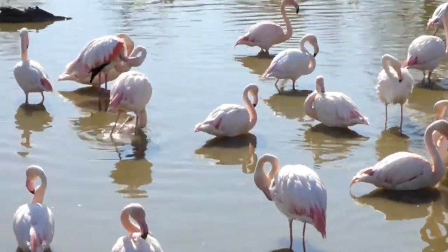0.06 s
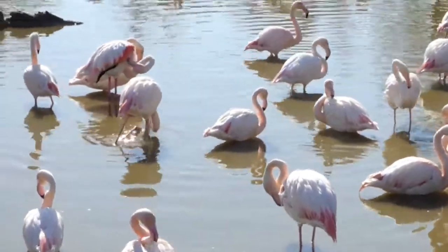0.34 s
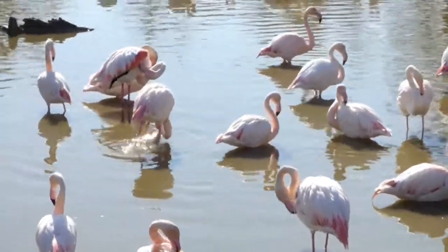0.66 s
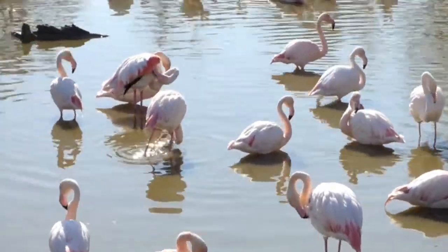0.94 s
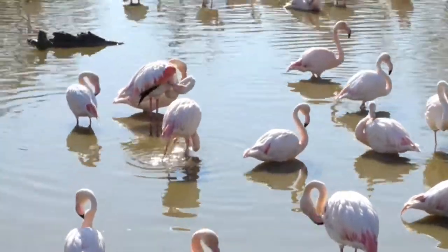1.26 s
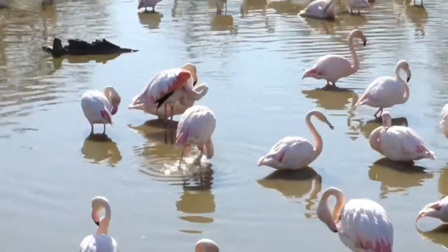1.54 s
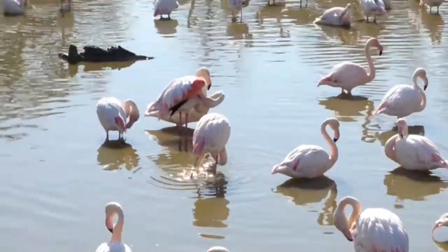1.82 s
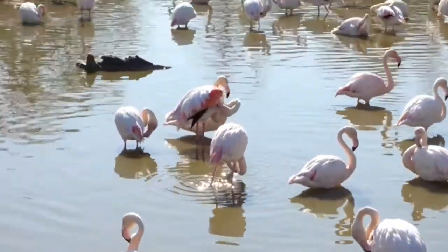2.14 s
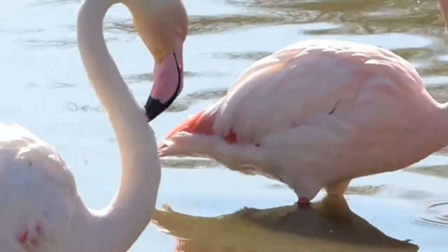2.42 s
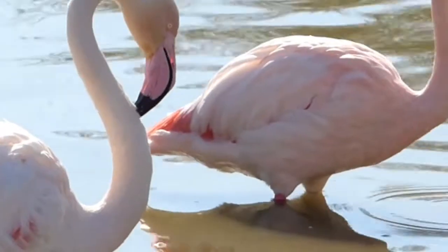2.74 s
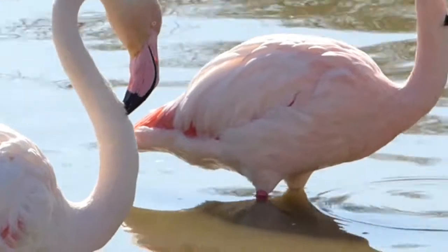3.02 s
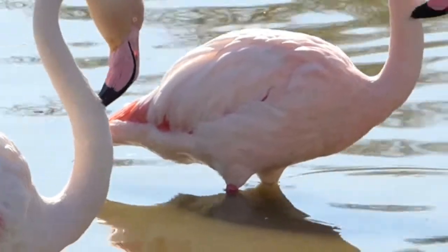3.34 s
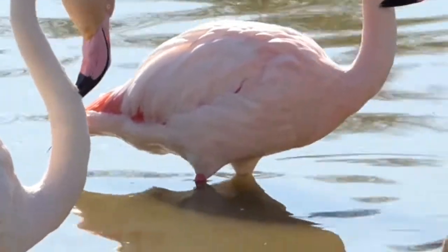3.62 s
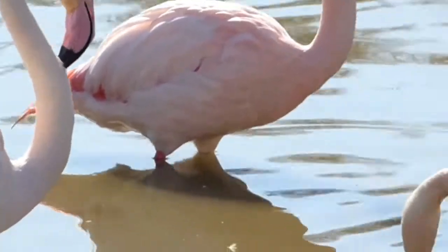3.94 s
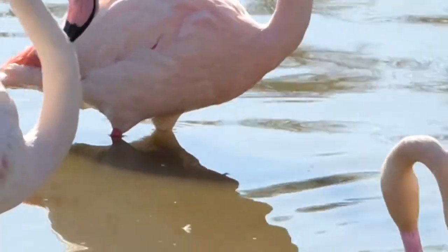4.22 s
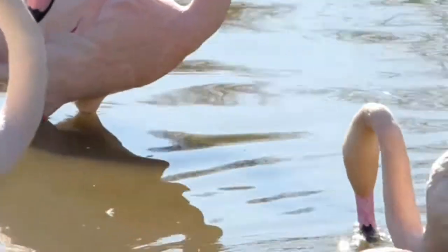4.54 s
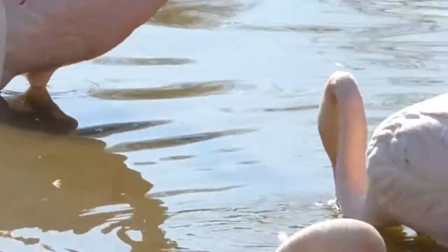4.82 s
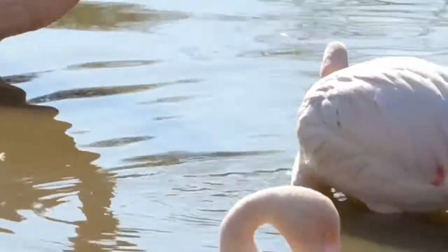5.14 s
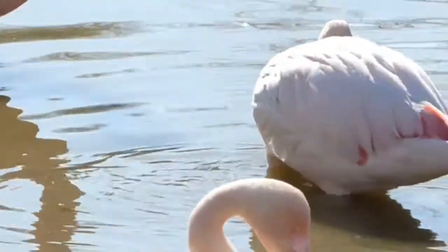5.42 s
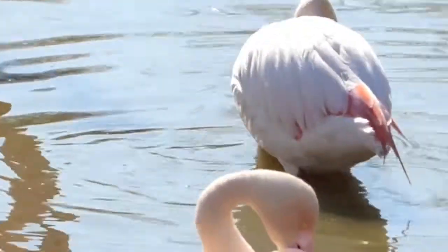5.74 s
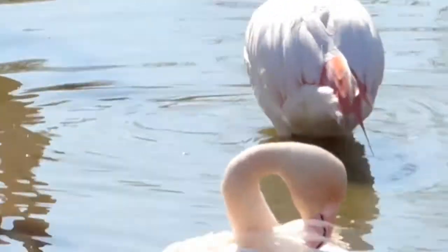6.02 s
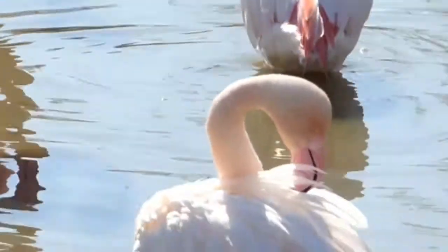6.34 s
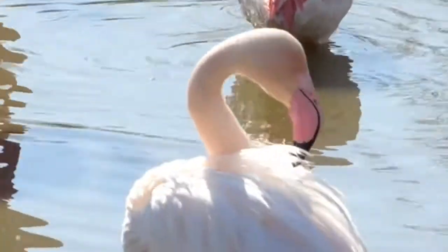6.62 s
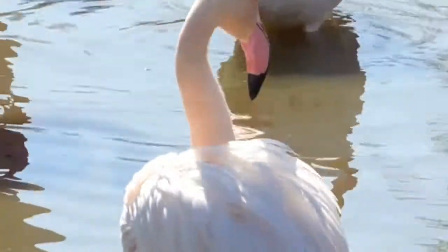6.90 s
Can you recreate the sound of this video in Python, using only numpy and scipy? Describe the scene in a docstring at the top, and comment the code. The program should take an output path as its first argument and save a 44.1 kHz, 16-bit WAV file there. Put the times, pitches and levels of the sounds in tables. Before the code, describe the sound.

On an open lagoon, a small bird gives thin, quavering whistles over soft flamingo calls. After a tiny dropout, the near flamingos grunt and honk louder, slightly left of the microphone, with the distant flock gabbling behind them. A second, longer silence interrupts, then the raspy grunts and reedy honks carry on busily to the end. One small water drip, a faint echo and a low rumble of outdoor air go with them.

```python
"""A lagoon, with flamingos close to the microphone and the rest of the flock gabbling farther out.
The near birds grunt as the syrinx rattles into throat and bill, and honk in short nasal arches.
Water drips from a bill, a small bird whistles early on, a distant one coos, and the banks echo faintly.
Under it all lie a low outdoor rumble and a far hum. The sound breaks off into silence twice;
the phrase between the silences returns later."""
import sys
import numpy as np
from scipy import signal
from scipy.fft import rfft, irfft, next_fast_len
from scipy.io import wavfile
from scipy.ndimage import uniform_filter1d, map_coordinates

SR = 44100
rng = np.random.default_rng(int(sys.argv[2]) if len(sys.argv) > 2 else 0)


def transcribe(signal):
    """Save signal, clipped to [-1, 1], as a 16-bit WAV file at the path in sys.argv[1]."""
    frames = np.atleast_2d(signal).T
    limited = np.clip(frames, -1, 1)
    pcm = np.round(limited * 32767).astype(np.int16)
    wavfile.write(sys.argv[1], SR, pcm)


N = 316197

# The spectra of a flamingo's throat and of the buzz at its bill. Each row: frequency in Hz, gain in dB.
THROAT_SPECTRUM = [(60, -48.5), (250, -31.5), (400, -26), (520, -12), (680, -7), (900, 2.5), (1130, 3),
                   (1450, -8), (1700, -20.5), (3000, -54.5)]
BUZZ_SPECTRUM = [(4000, -8), (7300, 9), (8400, 3), (9300, 0.5), (10100, -5.5), (11900, -0.5), (13200, -12)]
# The two silences. Each row: start, end and length of the fade back in, all in seconds.
GAPS = [(1.206, 1.288, 0.036), (2.367, 2.781, 0.00059)]


def grunts(lead_s=.008, attack_s=.017, release_s=.03, rattle_hz=96.9, nasal_hz=2170):
    """Close by, each rattle rings throat and nasal resonances, rasps in the windpipe, buzzes at the bill."""
    # Each row: start in seconds, length in seconds, throat level in dB, throat resonance in Hz, voice.
    calls = [(.025, .105, -35, 960, "soft"), (.39, 0.065, -40, 940, "soft"), (.49, 0.054, -35, 925, "soft"),
             (.588, 0.081, -32.5, 880, "soft"), (.711, .07, -34, 905, "soft"),
             (.829, 0.075, -32, 916, "full"), (.905, .065, -45, 960, "soft"),
             (1.135, 0.062, -38.5, 872, "soft"), (1.34, 0.049, -31, 894, "full"),
             (1.389, 0.056, -29.5, 957, "harsh"), (1.465, .045, -38.5, 950, "harsh"),
             (1.525, 0.068, -27.5, 990, "shrill"), (1.79, .094, -34.5, 863, "nasal"),
             (1.888, 0.058, -34, 1120, "buzzy"), (2.038, .08, -32.5, 911, "buzzy"),
             (2.143, .1, -25.5, 971, "round"), (2.295, .07, -29.5, 961, "round"),
             (2.809, .12, -30, 900, "nasal"), (3.038, .068, -36.5, 718, "deep"),
             (3.124, .045, -30.5, 1187, "bright"), (3.235, .072, -37.5, 1140, "round"),
             (3.307, .1, -35, 815, "raspy"), (3.443, .065, -31.5, 902, "full"),
             (3.64, .09, -30.5, 857, "deep"), (3.802, .08, -25.5, 861, "deep"),
             (4.01, 0.078, -35.5, 902, "nasal"), (4.105, .13, -31.5, 861, "croaky"),
             (4.245, 0.068, -36, 925, "croaky"), (4.31, 0.064, -37.5, 1000, "bright"),
             (4.372, .087, -33, 901, "harsh"), (4.496, .09, -28, 930, "round"),
             (4.584, 0.071, -33.5, 812, "nasal"), (4.858, 0.08, -30.5, 874, "full"),
             (4.984, .077, -29, 902, "full"), (5.044, 0.041, -32, 1164, "bright"),
             (5.125, 0.079, -28, 890, "raspy"), (5.24, .083, -25, 904, "full"),
             (5.494, 0.099, -29, 904, "croaky"), (5.612, 0.148, -25.5, 873, "full"),
             (6.79, .058, -25.5, 902, "deep"), (6.858, 0.064, -29, 874, "deep"),
             (6.915, 0.16, -30.5, 852, "harsh")]
    # Each voice: twang, rasp and buzz in dB over the throat, bill resonance in Hz, left over right in dB.
    voices = { "raspy": (-18, -8.5, -22.5, 8600, 3), "croaky": (-5.5, -7.5, -18, 8500, 6.5),
              "harsh": (-10, -6.5, -12.5, 8699, 3.5), "shrill": (-17.5, -5, -12.5, 12100.5, 4),
              "buzzy": (-10, -11.5, -5, 8398, 1.5), "round": (-21, -16, -18, 9496.5, 0.5),
              "deep": (-24.5, -14.5, -16, 10000, 2), "full": (-15, -12, -19, 8601, 2),
              "nasal": (-4.5, -8.5, -22.5, 8701, 7), "soft": (-11, -12, -27, 7799, 2),
              "bright": (-35, -7, -17, 8800, 3.5)}
    # The upper windpipe. Each row: frequency in Hz, gain in dB.
    rasp_spectrum = [(900, -27.5), (1500, -7.5), (2150, 2), (2400, -7), (2750, -2.5), (4200, 2.5),
                     (5300, 0), (6200, -9.5), (9000, -43.5)]
    out = np.zeros((2, N))
    for s, length, db, throat_hz, voice in calls:
        twang_db, rasp_db, buzz_db, bill_hz, pan_db = voices[voice]
        # forced, buzzing grunts rattle slowly and evenly; soft ones faster and raggedly
        rate = rattle_hz - .5 * buzz_db + rng.normal(0, 2)
        jitter = np.interp(buzz_db, [-22, -15], [.08, .02])
        source = rattle(length + lead_s + release_s / 2, rate, throat_hz * .97, jitter)
        t = np.arange(len(source)) / SR
        progress = t / t[-1]
        source = source * np.clip(np.minimum(t / attack_s, (t[-1] - t) / release_s), 0, 1)
        sag = 1 + .13 * (1 / 3 - progress ** 2)  # the resonances sink as the neck relaxes
        ring = amp(.5) * resonance(source, throat_hz * sag, width_hz=320)
        throat = unit(unit(colour(source, THROAT_SPECTRUM, throat_hz / 930)) + ring)
        twang = amp(twang_db) * resonance(source, nasal_hz * sag, width_hz=430)
        rasp = amp(rasp_db) * unit(colour(source, rasp_spectrum))
        # the bill buzzes at the height of each opening, and rings highest in mid-call, when widest open
        crests = source * np.abs(uniform_filter1d(source ** 2, size=100)) ** .25
        bill = resonance(crests, bill_hz * (1 - .13 * (2 * progress - 1) ** 2), width_hz=1300)
        broad_buzz = unit(colour(crests, BUZZ_SPECTRUM, bill_hz / 8400))
        buzz = amp(buzz_db) * unit(broad_buzz + amp(-4.5) * bill)
        add(out, amp(db) * (throat + twang + rasp + buzz), s - lead_s, pan_db)
    return out


def rattle(length, rate, ring_hz, jitter, decay_db=.5, hiss_share=.22, leak=.7, count=5):
    """The syrinx opens about 100 times a second, and each time claps a few times at its own pitch."""
    n = int(length * SR)
    chance = rng.standard_normal((40, 2 + 2 * count))  # one row per opening
    clap = np.arange(count)
    opens_s = (np.cumsum(1 + jitter * chance[:, 0]) - rng.uniform()) / rate
    # the clap pattern repeats through a call, which carves its own ridges into the spectrum
    pattern = clap + .08 * rng.standard_normal(count) + .018 * chance[:, 2:2 + count]
    sizes = amp(1.1 * (chance[:, 1:2] + chance[:, 2 + count:]) - decay_db * np.abs(clap - 1.3))
    clap_samples = np.abs((opens_s[:, None] + pattern / ring_hz) * SR).astype(int)
    claps = np.bincount(clap_samples.ravel(), sizes.ravel(), n)[:n]
    # air hisses through while the syrinx is open, and a little leaks in between
    opening = np.sqrt(np.abs(uniform_filter1d(claps ** 2, int(SR / ring_hz)))) + leak * claps.std()
    return np.sqrt(1 - hiss_share) * claps + np.sqrt(hiss_share) * opening * rng.standard_normal(n)


def honks():
    """The near birds honk; each voice has its own brightness, hoarseness and place."""
    # Each row: start in seconds, length in seconds, top pitch in Hz, fundamental in dB,
    # overtones in dB over it before shaping, voice.
    calls = [(0.098, .1, 724, -40, -5, "nasal"), (.19, .055, 736, -42.5, -10, "far"),
             (.275, .07, 598, -49, 2, "far"), (0.279, .11, 736, -39, -8, "far"),
             (0.619, .1, 773, -42.5, 0.5, "far"), (0.762, 0.084, 804, -31, -10.5, "far"),
             (1.092, .13, 764, -42, -11.5, "nasal"), (1.261, .115, 721.4, -32, -11.5, "brassy"),
             (1.59, 0.073, 716.3, -35.5, -6.5, "reedy"), (1.645, .11, 788.6, -35.5, -7, "reedy"),
             (1.786, .11, 748.7, -35, -5, "nasal"), (2.226, 0.099, 684, -34.5, -7, "far"),
             (2.815, 0.092, 793, -29, -10, "reedy"), (2.96, 0.0576, 783, -33, -8, "clear"),
             (3.029, .093, 633, -33, -8.5, "far"), (3.045, 0.095, 788, -33.5, -8, "clear"),
             (3.3, 0.0954, 748, -35.5, -7, "reedy"), (3.386, .115, 742, -36.5, -6, "clear"),
             (3.541, 0.115, 600, -46, 0, "far"), (3.844, 0.087, 764, -37.5, -9.5, "clear"),
             (3.93, .1, 565, -39.5, -6.5, "far"), (4.059, 0.092, 746, -37.5, -7.5, "nasal"),
             (4.6, 0.111, 719, -31.5, -2.5, "far"), (4.657, 0.1005, 801.5, -32.5, -3.5, "reedy"),
             (4.872, .058, 791, -35, -4, "reedy"), (4.957, 0.0976, 799, -30, -7.5, "reedy"),
             (5.275, 0.0906, 715, -29.5, -14, "hoarse"), (5.385, .1, 556, -37, -16, "far"),
             (5.584, 0.084, 771, -28.5, -10, "reedy"), (5.638, 0.084, 758, -31.5, -9.5, "reedy"),
             (6.789, .105, 692, -35, -12.5, "brassy"), (6.801, .12, 915, -26, -13, "far"),
             (6.874, 0.101, 752, -33.5, -7, "hoarse"), (6.92, .135, 710, -32.5, -12, "brassy"),
             (6.95, .08, 701.5, -34.5, 3, "far"), (7.052, 0.1024, 785, -34, -5, "clear")]
    # Each voice: reach of the overtones in Hz, hoarseness from 0 to 1, left over right in dB.
    voices = { "far": (1800, 0.28, 0.95), "nasal": (2400, 0.32, 8), "hoarse": (5600, 0.75, 3.3),
              "reedy": (4700, .8, 8.9), "clear": (6250, 0.42, 7.3), "brassy": (9700, 0.51, .5)}
    out = np.zeros((2, N))
    for s, length, pitch_hz, db, overtones_db, voice in calls:
        reach_hz, hoarse, pan_db = voices[voice]
        add(out, amp(db) * honk(length, pitch_hz, overtones_db, reach_hz, hoarse), s, pan_db)
    return out


def honk(length, pitch_hz, overtones_db, reach_hz, hoarse, arch=.0579, flutter_db=2, count=19):
    """Reedy harmonics on a pitch arch, brightest at its top; hoarseness shakes pitch and level."""
    # The shape of the overtones. Each row: frequency in Hz, gain in dB.
    spectrum = [(1500, 0.5), (2300, 1.5), (3100, -3.5), (3900, -2.5), (6300, -1), (7500, -2), (9500, 0),
                (14000, -19.5)]
    n = int(length * SR)
    from_top = 2 * np.linspace(0, 1, n) ** np.exp(.14 * rng.standard_normal()) - 1  # peaks early or late
    hz = pitch_hz * (1 - arch * np.abs(from_top) ** 2.363 + hoarse * .016 * wobble(450, n))
    phase = 2 * np.pi * np.cumsum(hz) / SR
    k = np.arange(1, count + 1)
    octaves_beyond = np.clip(np.log2(k * pitch_hz / reach_hz), 0, None)
    cliff_db = 12 * np.minimum(octaves_beyond / .45, 1) + 5 * octaves_beyond
    scatter_db = 2 * rng.standard_normal(count)
    db = np.where(k == 1, 0, overtones_db + along(spectrum, k * pitch_hz) - cliff_db + scatter_db)
    flutter = np.array([np.interp(from_top, np.linspace(-1, 1, 10), knots)
                        for knots in rng.standard_normal((count, 10))])
    sizes = amp(db[:, None] + flutter_db * flutter - .79 * k[:, None] * from_top ** 2)
    harmonics = np.sin(np.outer(k, phase) + rng.uniform(0, 2 * np.pi, (count, 1)))
    stack = np.sqrt(2) * np.sum(sizes * harmonics, axis=0)
    return stack * swell(n, edge=.36) * unit(amp(hoarse * 3 * wobble(300, n)))


def whistles(overtone_db=-31, quaver=.012, chirps=12, chirp_s=.033, chirp_hz=3900, chirp_db=-53.5):
    """Off to the left a small bird gives thin, quavering whistles, with faint chirps between them."""
    # Each row: start in seconds, length in seconds, first, middle and last pitch in Hz, level in dB.
    notes = [(0, 0.042, 4900, 3660, 3550, -43), (0.044, .053, 3440, 3900, 3000, -46),
             (.301, 0.05, 3900, 4030, 3400, -39.5), (0.341, 0.075, 3360, 3160, 2780, -43.5),
             (0.54, 0.047, 2450, 2870, 2550, -46), (.685, 0.046, 5100, 5650, 5200, -60),
             (.75, 0.056, 4700, 5450, 4900, -53.5), (0.849, .13, 2980, 3570, 2650, -32.5),
             (0.947, 0.037, 4300, 5000, 4850, -39), (0.996, .06, 3650, 3450, 4640, -44),
             (1.047, 0.043, 3850, 3150, 2970, -51.5)]
    for i in range(chirps):
        s = (i + rng.uniform()) * GAPS[0][0] / chirps
        pitches = chirp_hz * np.exp(.24 * rng.standard_normal(3))
        notes = notes + [(s, chirp_s, *pitches, chirp_db)]
    out = np.zeros((2, N))
    for s, length, *pitches, db in notes:
        n = int(length * SR)
        hz = np.polyval(np.polyfit([0, .5, 1], pitches, 2), np.linspace(0, 1, n))
        phase = 2 * np.pi * np.cumsum(hz * (1 + quaver * wobble(600, n))) / SR
        tone = np.sin(phase) + amp(overtone_db) * (np.sin(2 * phase) + np.sin(3 * phase))
        add(out, amp(db) * swell(n, edge=.7) * unit(tone * amp(2 * wobble(120, n))), s, pan_db=8)
    return out


def drips(plop_hz=410, splat_db=10):
    """Water falls from a bill: a small splat over a short low plop."""
    # Each row: start in seconds, level in dB.
    drops = [(1.17, -47.5), (4.831, -34)]
    t = np.arange(SR // 12) / SR
    attack = 1 - np.exp(-t / .00045)
    out = np.zeros((2, N))
    for s, db in drops:
        splat = amp(splat_db) * colour(rng.standard_normal(len(t)), BUZZ_SPECTRUM) * amp(-60 * t / .022)
        plop = np.sin(2 * np.pi * plop_hz * t * (1 + t)) * amp(-60 * t / .25)
        add(out, amp(db) * (splat + plop) * attack, s, pan_db=0)
    return out


def gabble(count=105, honk_db=-4, echo_db=-7, rasp_db=-8, buzz_db=-20, murmur_db=-18):
    """Farther out, many birds grunt and honk at random; the farthest blur into a murmur."""
    # The flock's rise and fall. Each row: time in seconds, level in dB.
    flock_level = [(0, -35), (.25, -42.5), (.8, -37.5), (1.05, -49.5), (1.4, -31.5), (1.97, -32.5),
                   (2.3, -31), (2.85, -28.5), (3.2, -32.5), (3.95, -33), (4.2, -30), (4.8, -32),
                   (5.25, -26.5), (5.43, -31), (7.0, -27)]
    # Rasp, buzz and murmur from across the water. Each row: frequency in Hz, gain in dB.
    rasp_spectrum = [(1000, -20.5), (1600, 2), (2200, 5), (2750, 0.5), (4400, 1.5), (6500, -27),
                     (11000, -39)]
    buzz_spectrum = [(3000, -45.5), (6000, -2.5), (9000, -2.5), (11500, -11), (14500, -24)]
    murmur_spectrum = [(300, -35), (800, -9), (1800, -22), (4300, -12), (10000, -28), (14000, -42.5)]
    rattles, calls = np.zeros((2, N)), np.zeros((2, N))
    for i, (when, size, pitch, side, pace, lag) in enumerate(rng.standard_normal((count, 6))):
        s = (i + when / 4) * N / SR / count - .05
        grunt = rattle(.14, rate=112 * np.exp(.15 * pace), ring_hz=850 * np.exp(.17 * pitch), jitter=.08)
        add(rattles, amp(2 * size) * unit(grunt) * swell(len(grunt), edge=.78), s, pan_db=3.4 + 3 * side)
        call = honk(.085 * np.exp(.2 * pace), 730 * np.exp(.13 * pitch),
                    overtones_db=-4, reach_hz=3500, hoarse=.6, arch=.09)
        add(calls, amp(2 * size) * call, s + .02 * lag, pan_db=3 + 3 * pace)
    voices = unit(rattles) + amp(honk_db) * unit(calls)

    def distant(spectrum):
        """The voices and their echoes through one part of the windpipe."""
        echoing = voices + amp(echo_db) * shore(voices)
        return unit(np.array([colour(channel, spectrum) for channel in echoing]))

    calm = np.arange(N) / SR < GAPS[0][1]  # the flock starts calmer, so duller: more rasp, less buzz
    throats = distant(THROAT_SPECTRUM)
    rasps = amp(rasp_db + 3 * calm) * distant(rasp_spectrum)
    buzzes = amp(buzz_db - 3 * calm) * distant(buzz_spectrum)
    murmur = amp(murmur_db) * unit(colour(rng.standard_normal(N), murmur_spectrum))
    return amp(timeline(flock_level)) * (throats + rasps + buzzes + murmur)


def coo():
    """One faint, low, nearly pure note from a distant bird."""
    # In order: start in seconds, length in seconds, pitch in Hz, level in dB.
    note = (0.6, 0.02, 287.5, -50)
    s, length, hz, db = note
    out = np.zeros((2, N))
    add(out, amp(db) * honk(length, hz, overtones_db=-22, reach_hz=600, hoarse=1), s, pan_db=0)
    return out


def shore(x):
    """Banks and trees scatter a short tail back over the water."""
    # Each row: frequency in Hz, seconds to die away by 60 dB.
    decay_times = [(1000, 0.58), (12000, 0.25)]
    hz, t, noise = signal.stft(rng.standard_normal((2, SR // 2)), SR, nperseg=256)
    tail = signal.istft(noise * amp(-60 * t / along(decay_times, hz)[:, None]), SR, nperseg=256)[1]
    return signal.fftconvolve(x, tail / np.linalg.norm(tail[0]), axes=1)[:, :N]


def rumble(side_db=-22):
    """Low outdoor air, nearly alike on both sides of the microphone."""
    # Each row: frequency in Hz, gain in dB.
    air_spectrum = [(40, -37), (75, -13), (170, -4.5), (310, 3), (375, -5.5), (450, -2), (700, 3),
                    (15000, -91.5)]
    # Each row: time in seconds, level in dB.
    air_level = [(1.2, -49), (1.3, -41.5), (2.8, -41.5), (7.17, -39.5)]
    mid, side = (unit(colour(rng.standard_normal(N), air_spectrum)) for _ in range(2))
    return amp(timeline(air_level) + 1.6 * wobble(12, N)) * (mid + amp(side_db) * np.array([side, -side]))


def far_hum(end_s=5.4):
    """Far off, two low tones beat before the first silence; a hum holds for a while after the second."""
    # The beating pair and the hum. Each row: frequency in Hz, level in dB.
    throb_tones = [(98, -62), (107.5, -62)]
    hum_tones = [(80.7, -65.5), (161.4, -56)]
    t = np.arange(N) / SR

    def tone(hz, db):
        """A sine that drifts a little in level and phase."""
        peak = np.sqrt(2) * amp(db + 1.4 * wobble(1.5, N))
        return peak * np.sin(2 * np.pi * hz * t + .48 * wobble(3.6, N))

    throb = sum(tone(hz, db) for hz, db in throb_tones) * (t < GAPS[0][0])
    hum = sum(tone(hz, db) for hz, db in hum_tones) * (t > GAPS[1][0]) * (t < end_s)
    return throb + hum


def amp(db):
    """Decibels to gain."""
    return 10 ** (np.asarray(db) / 20)


def unit(x):
    """Scale to rms 1."""
    return x / np.sqrt(np.mean(x ** 2) + 1e-20)


def along(points, hz):
    """Read (Hz, value) points at hz, on a log axis."""
    f, v = np.transpose(points)
    return np.interp(np.log(hz + 1), np.log(f + 1), v)


def timeline(points):
    """Join (seconds, value) points into one value per sample."""
    return np.interp(np.arange(N) / SR, *np.transpose(points))


def wobble(rate, n):
    """A smooth random curve of n samples, rate knots a second."""
    return map_coordinates(rng.standard_normal(int(n * rate / SR) + 4), [np.arange(n) * rate / SR])


def swell(n, edge):
    """The envelope of a call, rms 1; edge is the share spent rising and falling."""
    return unit(signal.windows.tukey(n, edge))


def colour(x, spectrum, shift=1, size=2048):
    """Causal filter with the given spectrum, moved in frequency by the factor shift."""
    cepstrum = irfft(np.log(amp(along(spectrum, np.fft.rfftfreq(size, 1 / SR) / shift))))
    cepstrum[1:size // 2] *= 2
    cepstrum[size // 2 + 1:] = 0
    return signal.fftconvolve(x, irfft(np.exp(rfft(cepstrum))))[:len(x)]


def resonance(x, hz, width_hz):
    """A steep resonance whose centre follows the curve hz."""
    turn = np.exp(2j * np.pi * np.cumsum(hz) / SR)
    pole = np.exp(-np.pi * width_hz / SR)
    return unit((signal.lfilter([1], np.poly([pole, pole]), x / turn) * turn).real)


def add(out, x, s, pan_db):
    """Mix a mono call into the stereo bus at s seconds, pan_db louder on the left."""
    i = max(round(s * SR), 0)
    gains = amp([[pan_db / 2], [-pan_db / 2]])
    part = out[:, i:i + len(x)]
    part += (gains / gains.mean() * x)[:, :part.shape[1]]


def repeat_phrase(x, from_s=1.26, to_s=2.365, later_s=4.44, fade_s=.02):
    """One phrase comes a second time, cross-faded in place of the sound there."""
    t = np.arange(N) / SR - later_s
    share = np.clip(np.minimum(t - from_s, to_s - t) / fade_s, 0, 1)
    return np.sqrt(1 - share) * x + np.sqrt(share) * np.roll(x, round(later_s * SR), axis=1)


def scene():
    """Near birds and their echo off the shore, over the flock and the distant background."""
    near = grunts() + honks() + drips() + whistles()
    echo = amp(-9) * shore(near)
    return near + echo + coo() + gabble() + rumble() + far_hum()


def record(dry):
    """A phrase repeats and the sound cuts out twice; the top treble rolls off, then stops altogether."""
    # The microphone's roll-off. Each row: frequency in Hz, gain in dB.
    roll_off = [(13200, 0.5), (15700, -26.5)]
    top_hz = 15730
    t = np.arange(N) / SR
    gate = np.ones(N)
    for off, on, fade in GAPS:
        gate *= np.where(t < off, 1, np.clip((t - on) / fade, 0, 1))
    size = next_fast_len(N + SR // 2)
    hz = np.fft.rfftfreq(size, 1 / SR)
    response = amp(along(roll_off, hz)) * (hz < top_hz)
    return irfft(rfft(repeat_phrase(dry) * gate, size) * response, size)[:, :N]


dry = scene()
out = record(dry)
transcribe(out)
```